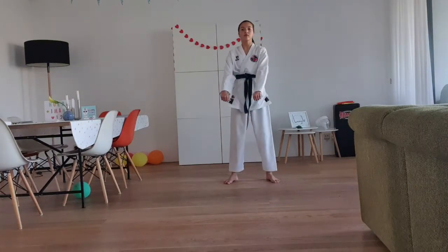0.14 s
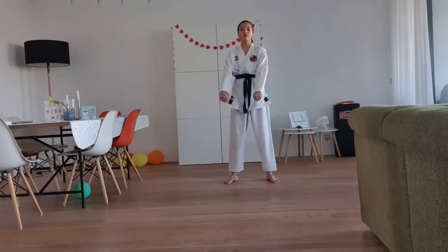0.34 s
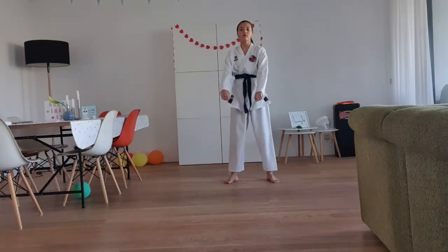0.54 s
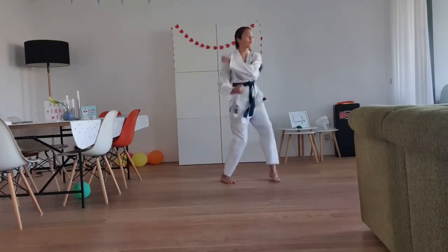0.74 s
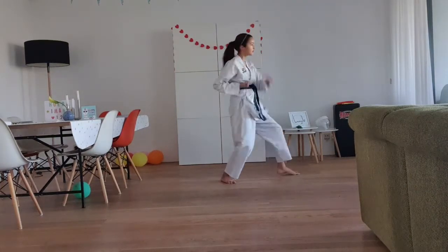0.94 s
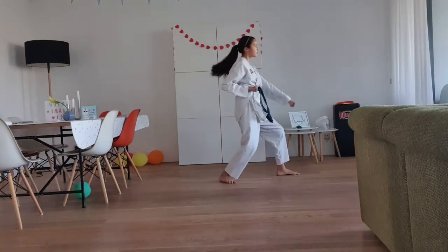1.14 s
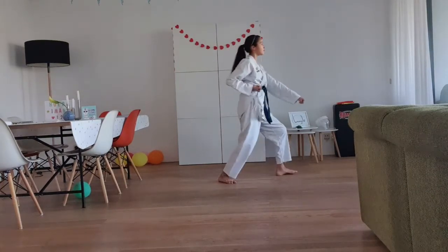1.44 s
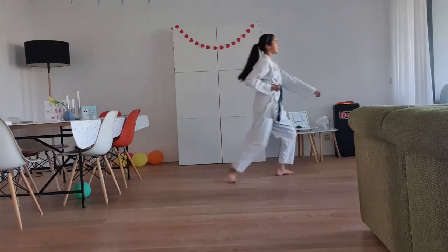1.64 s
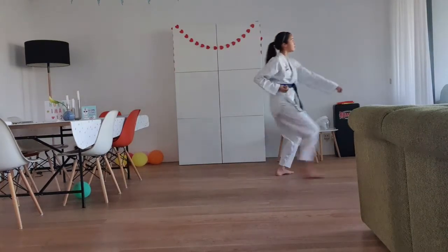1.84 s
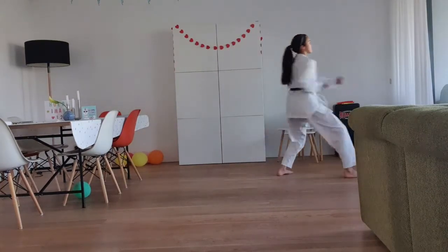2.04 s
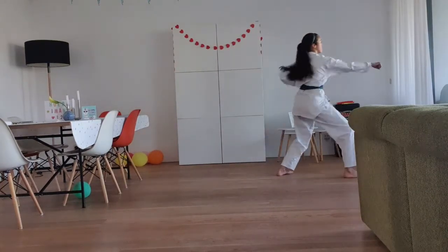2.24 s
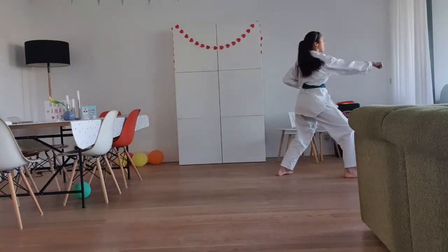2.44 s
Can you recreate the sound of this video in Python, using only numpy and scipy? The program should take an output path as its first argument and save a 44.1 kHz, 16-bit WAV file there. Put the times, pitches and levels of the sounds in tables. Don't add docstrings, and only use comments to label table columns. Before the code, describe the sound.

A stiff cotton martial arts uniform moves over faint low rumble and hum. Quiet until about 0.65 s, then cloth swishes with soft barefoot thuds, a scuff and small squeak until 1.2 s. A lull follows. From 1.65 s, stronger rustling, foot drags and squeaks reach 2.0 s; a heavy thump lands at 2.08 s, then whipping sleeves crack sharply at 2.2-2.3 s, leaving room echo and quiet hum.

```python
import sys
import numpy as np
from scipy import signal
from scipy.fft import rfft, irfft
from scipy.io import wavfile

SR = 44100
rng = np.random.default_rng(int(sys.argv[2]) if len(sys.argv) > 2 else 0)


def store_wav(level_fs):
    pcm = np.round(np.clip(np.atleast_2d(level_fs), -1, 1) * 32767)
    wavfile.write(sys.argv[1], SR, pcm.T.astype(np.int16))


def voltage_ratio(decibels):
    exponent = np.asarray(decibels, float) / 20
    return 10 ** exponent


N = 115101

# f/Hz, level/dB per Hz
RUMBLE_SPECTRUM = [(35, 0.5), (80, 1.5), (125, -6.5), (420, -18.5), (1000, -39.5), (4200, -47.5),
                   (6300, -55.5), (13000, -57)]
# f/Hz, width/Hz, level/dB
AIR_MODES = [(49, 10, -60), (90, 12, -59)]
# t/s, f/Hz, level/dB
HUM_TRACK = [
    (0.0, 283.6, -60.5),
    (1.6, 283.8, -57),
    (1.73, 278.4, -58),
    (2.12, 284.3, -52.5),
    (2.2, 288, -73),
    (2.22, 288.3, -50.5),
    (2.38, 282.4, -60.5),
    (2.57, 280.5, -57),
    (2.61, 284.9, -60),
]
RUMBLE_DB, HUM_GAIN_DB, HUM_WOBBLE_DB, HUM_WOBBLE_RAD = -54, 3.5, -0.2, 0.84

# t/s, level/dB, board f/Hz, ring t60/s, hardness/dB
LANDINGS = [(0.647, -43, 67.4, 0.22, -23), (0.809, -40.5, 67, 1, -10), (0.924, -38, 67, 0.22, -10),
            (0.992, -43, 52, .3, -6.5), (1.014, -40, 76.5, 0.15, -16), (1.105, -37.5, 73.8, 0.28, -10),
            (1.199, -39, 70.4, 0.19, -10), (1.298, -41.5, 69, 0.2, -12), (1.629, -37.5, 66, 0.17, -11.5),
            (1.746, -46.5, 83.4, 0.68, 2), (1.87, -36.5, 61, 0.28, -13.5), (2.08, -25.5, 79.3, 0.24, -6.5),
            (2.104, -32, 52, 0.19, -10), (2.158, -33, 72, 0.46, -5), (2.25, -37, 83.5, 0.24, -13),
            (2.332, -56, 67, 0.075, -3), (2.408, -45, 47, 0.34, -12), (2.5, -41, 51.4, 0.23, -13)]
# f/Hz, level/dB, t60/s
UPPER_FLOOR_MODES = [(138.4, 1, 0.18), (185, -29, 0.073)]
CONTACT_S, FOOT_PAN_DB = 0.0085, 0.7

# peak t/s, level/dB, rise/s, fall/s
SLIDES = [
    (.668, -80, 0.029, 0.025),
    (0.722, -57, 0.0088, 0.017),
    (.855, -54, 0.036, 0.0092),
    (1.67, -57, 0.021, 0.013),
    (1.762, -42.5, 0.012, 0.044),
    (1.82, -46, 0.017, 0.011),
    (1.875, -64, 0.0071, 0.014),
    (1.972, -61, 0.037, 0.018),
    (2.1, -51.5, 0.016, 0.037),
]
# f/Hz, width/Hz, level/dB
SLIDE_BANDS = [(2575, 400, 5), (2150, 120, -2.5), (1750, 70, -4.5), (3540, 800, 1.5), (4500, 1350, -7)]
# peak t/s, level/dB, rise/s, fall/s, board f/Hz
PIVOTS = [(.712, -51.5, 0.0096, 0.023, 386), (.822, -49, 0.016, 0.018, 362),
          (0.829, -54.5, 0.026, 0.011, 577), (1.752, -39, 0.022, 0.011, 380),
          (1.826, -44, 0.022, 0.018, 341), (.76, -55.5, .03, 0.035, 760), (1.765, -49, 0.011, 0.0089, 560),
          (1.8, -51, 0.013, 0.017, 728), (1.836, -48.5, 0.0085, .012, 638),
          (1.864, -50.5, 0.024, 0.0085, 434), (2.095, -48, 0.027, 0.014, 406),
          (2.21, -46, 0.016, 0.089, 478)]
# peak t/s, level/dB, rise/s, fall/s, f/Hz
SQUEAKS = [(.675, -80, .012, 0.013, 2530), (.703, -68, 0.0036, .012, 2385), (.822, -65, 0.0051, .008, 2480),
           (.847, -51, .006, .012, 2480), (.87, -73, .005, .006, 2560), (1.03, -60.5, .006, 0.011, 4100),
           (1.04, -62, .005, .008, 4500), (1.758, -45, 0.0032, 0.0044, 2520),
           (1.763, -43.5, 0.0056, 0.0064, 2400), (1.777, -49, 0.0042, 0.0042, 2660),
           (1.787, -46.5, 0.0032, 0.0054, 2280), (1.803, -47.5, .006, 0.0046, 2060),
           (1.826, -46, 0.0043, .005, 2640), (1.915, -59, .008, .01, 2290),
           (1.935, -55, .008, 0.0093, 2420), (1.955, -52, 0.014, .008, 2530),
           (1.972, -47.5, .006, 0.0031, 2650), (1.99, -47.5, 0.0038, .01, 2600)]
PIVOT_WIDTH_HZ, SQUEAK_WIDTH_HZ = 94, 76

# peak t/s, level/dB, rise/s, fall/s
BRUSHES = [(.675, -81, 0.009, 0.025), (.704, -58, 0.003, .05), (0.759, -57.5, 0.047, 0.021),
           (0.858, -53.5, 0.055, 0.049), (.94, -60.5, 0.011, 0.045), (1.034, -56, 0.019, 0.018),
           (1.125, -59, 0.077, 0.041), (1.209, -79, 0.013, 0.024), (1.45, -74.5, 0.051, 0.16),
           (1.58, -72.5, 0.046, 0.3), (1.665, -60, 0.0091, 0.15), (1.786, -50, 0.034, 0.079),
           (1.852, -51.5, 0.018, 0.032), (1.972, -49, 0.014, 0.023), (2.035, -56, 0.087, 0.062),
           (2.105, -54.5, 0.062, 0.035), (2.17, -54.5, 0.036, 0.083), (2.242, -51, 0.047, 0.013),
           (2.298, -70, 0.019, 0.025), (2.615, -63, 0.0054, .02)]
# f/Hz, level/dB per Hz
CLOTH_SPECTRUM = [(250, -4.5), (500, -10), (1100, -8.5), (2600, -4), (4800, -9.5), (6200, -16),
                  (13000, -23.5), (15800, -39)]
CLOTH_DB, FIBRES_PER_S, FIBRE_SPREAD_DB = 7, 9000, 0.5
SHEEN_HZ, SHEEN_DB_PER_DB, BRISK_DB = 5500, 0.98, -49.5

# peak t/s, level/dB, rise/s, fall/s
HEMS = [
    (.675, -73, 0.015, 0.027),
    (1.5, -84, 0.17, .1),
    (1.62, -77, 0.033, .03),
    (1.78, -65, 0.012, 0.035),
]
# f/Hz, level/dB per Hz
HEM_SPECTRUM = [(3500, 3), (6000, 5), (12000, -3), (15000, -11)]

# peak t/s, level/dB, rise/s, fall/s
WHIPS = [(.81, -51, 0.032, 0.14), (1.0, -67, 0.073, 0.03), (1.13, -53.5, 0.029, 0.078),
         (1.6, -69, 0.094, 0.067), (1.72, -74, 0.052, 0.028), (1.78, -51, 0.046, 0.025),
         (2.201, -44.5, 0.006, 0.019), (2.223, -43.5, 0.056, 0.025), (2.251, -44, 0.025, 0.021),
         (2.295, -46, 0.026, 0.023), (2.328, -48, 0.0098, 0.0076)]
# f/Hz, level/dB per Hz
WHIP_SPECTRUM = [(88, -42), (150, -3.5), (235, -7.5), (463, -10.5), (500, -14.5), (640, -6.5),
                 (3890, -22.5), (6000, -35), (7800, -35.5), (13200, -120)]
FLAPS_PER_S, FLAP_SPREAD_DB = 2500, 2.5

# t/s, level/dB
SNAPS = [
    (2.198, -46),
    (2.217, -50),
    (2.221, -42),
    (2.2485, -29),
    (2.2595, -33),
    (2.272, -46),
    (2.276, -27),
    (2.3, -33),
]
# f/Hz, level/dB per Hz
SNAP_SPECTRUM = [(250, -11), (700, 5), (1500, -3), (4000, -4), (9000, -24), (15000, -23)]

# f/Hz, t60/s
ROOM_T60 = [(100, 0.17), (600, 0.5), (2000, 0.73), (10000, 0.61)]
# f/Hz, level/dB
TAIL_COLOUR = [(300, 0.5), (2000, -1.5), (5000, -3), (12000, 2)]
# f/Hz, likeness/1
LIKENESS = [(60, .99), (130, .96), (250, .95), (450, .85), (800, .4), (1300, 0), (12000, 0)]
ROOM_DB, FIRST_ECHO_S, PORT_LAG_S, SHIFT_S = 1.5, 0.0035, 0.0005, 0.045
BRIEF_WET_DB, BRIEF_DRY_DB = -6.5, -2.5

# f/Hz, left minus right/dB
PORT_BALANCE = [(100, 0.1), (400, 1), (1500, 0.2), (2600, 1), (4400, -7), (8000, 0), (14000, -6)]
# f/Hz, level/dB
CAPSULE = [(4000, 0), (5300, -1), (5800, -3), (8000, -1.5), (10000, 1), (12700, .5), (14300, 4), (15000, 1),
           (15700, 1)]
MIC_CUT_HZ = 36


def at_hz(points, hz):
    f, v = np.transpose(points)
    return np.interp(np.log(hz + 1), np.log(f + 1), v)


def rms_one(x):
    return x / np.sqrt(np.mean(x ** 2) + 1e-20)


def colour(x, points):
    f = np.arange(N // 2 + 1) * SR / N
    gain = voltage_ratio(at_hz(points, f)) * (f > points[0][0] * 0.7)
    return irfft(rfft(x) * gain, N)


def drift(rate_hz):
    r = np.exp(-2 * np.pi * rate_hz / SR)
    noise = rng.standard_normal(N + SR)
    return rms_one(signal.lfilter([1], [1, -2 * r, r * r], noise)[SR:])


def resonate(x, hz, width_hz):
    r = np.exp(-np.pi * width_hz / SR)
    return signal.lfilter([1, 0, -1], [1, -2 * r * np.cos(2 * np.pi * hz / SR), r * r], x)


def resonate_twice(x, hz, width_hz):
    return resonate(resonate(x, hz, 2 * width_hz), hz, width_hz)


def grains(per_s, spread_db):
    sizes = voltage_ratio(spread_db * np.minimum(rng.exponential(1, N), 4)) * rng.choice([-1, 1], N)
    return sizes * (rng.random(N) < per_s / SR)


def swell(peak_s, db, rise_s, fall_s):
    t = np.arange(N) / SR - peak_s
    rise = np.exp(-0.5 * (t / max(rise_s, 0.002)) ** 2)
    fall = np.exp(-np.maximum(t, 0) / max(fall_s, 0.003))
    return voltage_ratio(db) * np.where(t < 0, rise, fall)


def swells(rows):
    return sum(swell(*row) for row in rows)


def pair(mid, side):
    n = len(mid)
    alike = np.clip(at_hz(LIKENESS, np.arange(n // 2 + 1) * SR / n), 0, 1)
    m = rfft(mid) * np.sqrt((1 + alike) / 2)
    d = rfft(side) * np.sqrt((1 - alike) / 2)
    return irfft(np.array([m + d, m - d]), n)


def background():
    noise, t = rng.standard_normal((2, N)), np.arange(N) / SR
    rumble = voltage_ratio(RUMBLE_DB) * rms_one(colour(pair(*noise), RUMBLE_SPECTRUM))
    air = 0
    for hz, width_hz, db in AIR_MODES:
        mode = resonate(resonate(pair(*noise), hz, 2 * width_hz), hz, 2 * width_hz)
        air = air + voltage_ratio(db) * rms_one(mode)
    s, hz, db = np.transpose(HUM_TRACK)
    hum_db = np.interp(t, s, db) + HUM_GAIN_DB + HUM_WOBBLE_DB * drift(5.6)
    phase = 2 * np.pi * np.cumsum(np.interp(t, s, hz)) / SR + HUM_WOBBLE_RAD * drift(3.4)
    return rumble + air + voltage_ratio(hum_db) * np.sin(phase)


def steps():
    out, t = np.zeros((2, N)), np.arange(N) / SR
    for k, (s, db, board_hz, ring_s, hard_db) in enumerate(LANDINGS):
        pan = voltage_ratio(FOOT_PAN_DB * (-1) ** k * np.array([[1], [-1]]))
        age = np.maximum(t - s, 0)
        onset = 1 - np.exp(-age / CONTACT_S)
        upper = [(hz, mode_db + hard_db, t60_s) for hz, mode_db, t60_s in UPPER_FLOOR_MODES]
        for hz, mode_db, t60_s in [(board_hz, 0, ring_s)] + upper:
            decay = voltage_ratio(db + mode_db - 60 * age / t60_s)
            out += pan * decay * onset * np.sin(2 * np.pi * hz * age)
    return out


def shudder(slips, rows, width_hz):
    out = 0
    for s, db, rise_s, fall_s, hz in rows:
        shape = swell(s, db, rise_s, fall_s)
        burst = shape * resonate_twice(slips, hz, width_hz)
        out = out + burst * np.sqrt(np.sum(shape ** 2) / np.sum(burst ** 2))
    return out


def soles():
    rub = grains(6000, 1.2)
    hiss = 0
    for hz, width_hz, db in SLIDE_BANDS:
        hiss = hiss + voltage_ratio(db) * rms_one(resonate_twice(rub, hz, width_hz))
    slides = rms_one(hiss) * swells(SLIDES)
    pivots = shudder(grains(980, 1.0), PIVOTS, PIVOT_WIDTH_HZ)
    return slides + pivots, shudder(rub, SQUEAKS, SQUEAK_WIDTH_HZ)


def cloth():
    level = np.sqrt(sum(swell(*row) ** 2 for row in BRUSHES))
    rub = rms_one(colour(grains(FIBRES_PER_S, FIBRE_SPREAD_DB), CLOTH_SPECTRUM))
    sheen = signal.sosfiltfilt(signal.butter(2, SHEEN_HZ, "high", fs=SR, output="sos"), rub)
    brightness = (level / voltage_ratio(BRISK_DB)) ** SHEEN_DB_PER_DB
    return level * voltage_ratio(CLOTH_DB) * (rub - sheen + sheen * brightness)


def hems():
    return rms_one(colour(rng.standard_normal(N), HEM_SPECTRUM)) * swells(HEMS)


def whips():
    return rms_one(colour(grains(FLAPS_PER_S, FLAP_SPREAD_DB), WHIP_SPECTRUM)) * swells(WHIPS)


def snaps():
    s, db = np.transpose(SNAPS)
    unit = colour(np.arange(N) == 0, SNAP_SPECTRUM)
    clicks = np.zeros(N)
    clicks[(s * SR).astype(int)] = voltage_ratio(db) / unit.max()
    return colour(clicks, SNAP_SPECTRUM)


def room(x, count=6):
    t, tail = np.arange(SR * 3 // 4) / SR, 0
    noise = rfft(np.array([pair(*rng.standard_normal((2, len(t)))) for _ in range(count)]))
    octave = np.log2(np.arange(len(t) // 2 + 1) * SR / len(t) / 50 + 1e-9)
    unit = np.sqrt(2 * np.log(1000) / 0.68 / SR)
    for step in range(10):
        t60_s = at_hz(ROOM_T60, 50 * 2 ** step)
        band = irfft(noise * np.maximum(1 - np.abs(octave - step), 0), len(t))
        decay_db = ROOM_DB + at_hz(TAIL_COLOUR, 55.5 * 2 ** step) - 60 * t / t60_s
        tail = tail + band * voltage_ratio(decay_db) * unit * (t > FIRST_ECHO_S)
    turn = np.arange(N) / SR / SHIFT_S
    out = 0
    for k in range(count):
        distance = np.abs((turn - k + count / 2) % count - count / 2)
        share = np.cos(np.pi / 2 * np.minimum(distance, 1)) ** 2
        far, near = k % 2, 1 - k % 2
        tail[k, far, round(PORT_LAG_S * SR * (k + 1) / count)] += voltage_ratio(-3)
        tail[k, near, 0] += voltage_ratio(-2)
        out = out + signal.fftconvolve(tail[k], (share * x)[None], axes=1)[:, :N]
    return out


def scene():
    around, floor = background(), steps()
    drags, squeaks = soles()
    body = drags + cloth() + hems() + whips()
    brief = squeaks + snaps()
    return room(body + voltage_ratio(BRIEF_WET_DB) * brief) + voltage_ratio(BRIEF_DRY_DB) * brief + floor + around


def roll_off(x):
    return signal.sosfilt(signal.butter(12, 15730, fs=SR, output="sos"), x)


def record(dry):
    f = np.arange(N // 2 + 1) * SR / N
    tilt_db = at_hz(PORT_BALANCE, f) / 2
    x = irfft(rfft(dry) * voltage_ratio(np.array([tilt_db, -tilt_db]) + at_hz(CAPSULE, f)), N)
    mix = signal.sosfilt(signal.butter(4, MIC_CUT_HZ, "high", fs=SR, output="sos"), x)
    return roll_off(mix)


dry = scene()
out = record(dry)
store_wav(out)
```